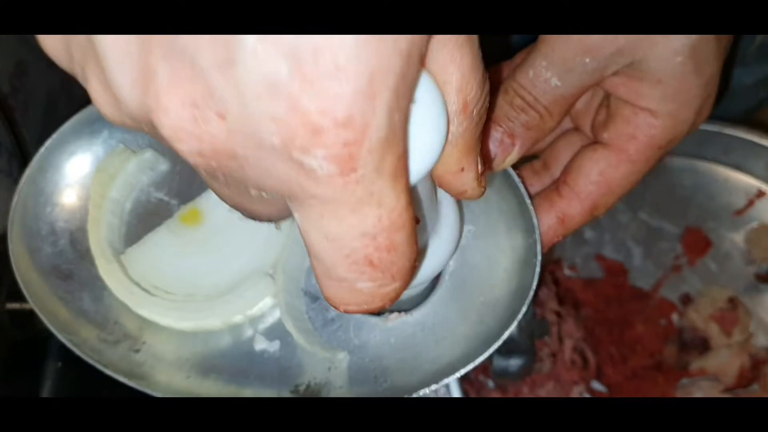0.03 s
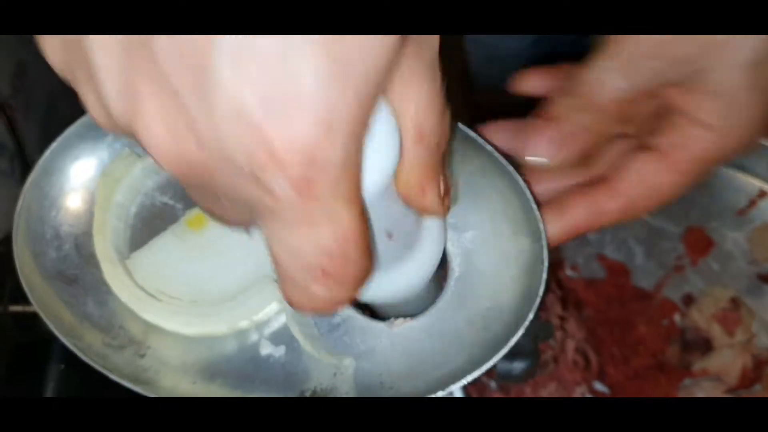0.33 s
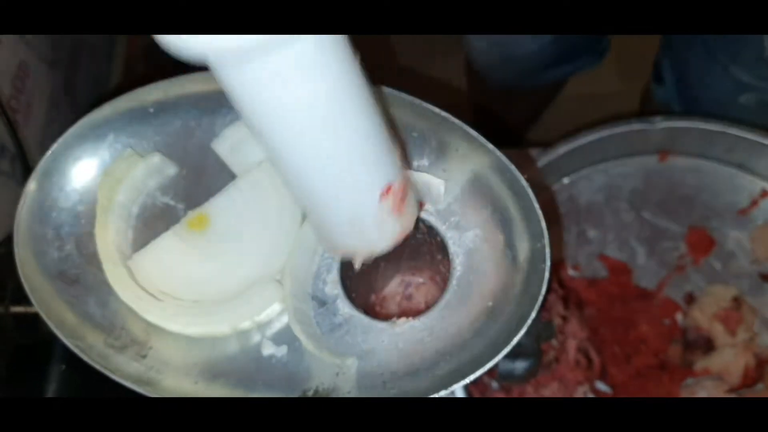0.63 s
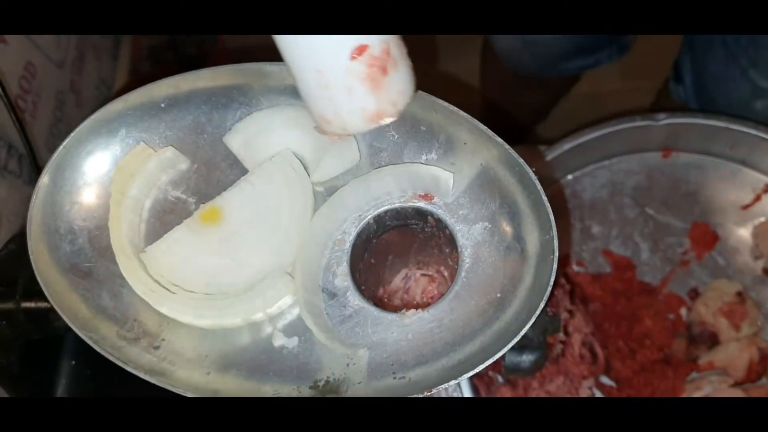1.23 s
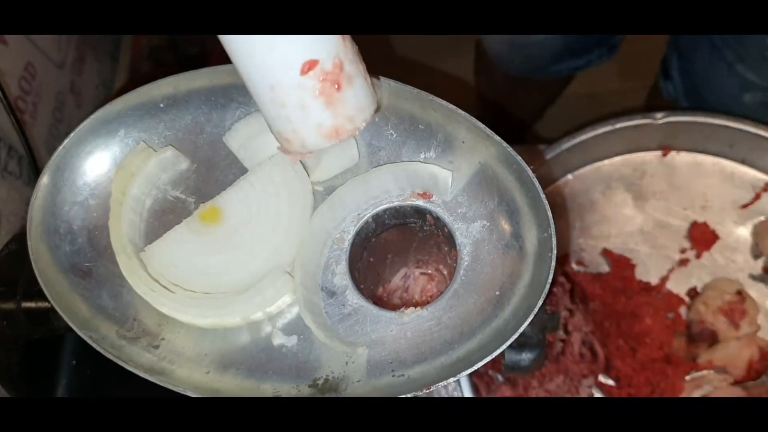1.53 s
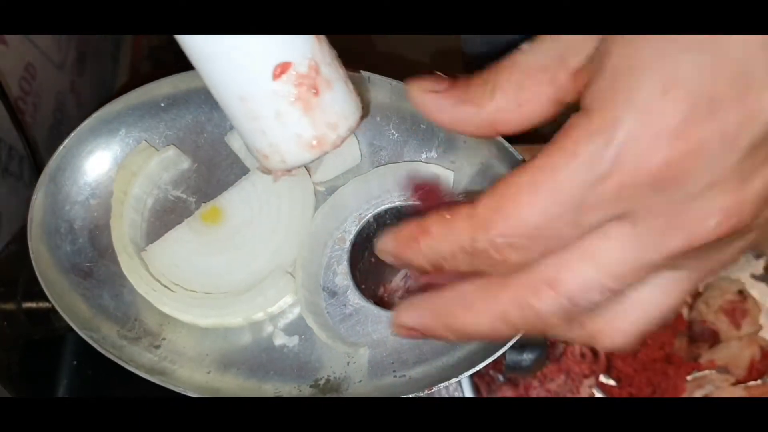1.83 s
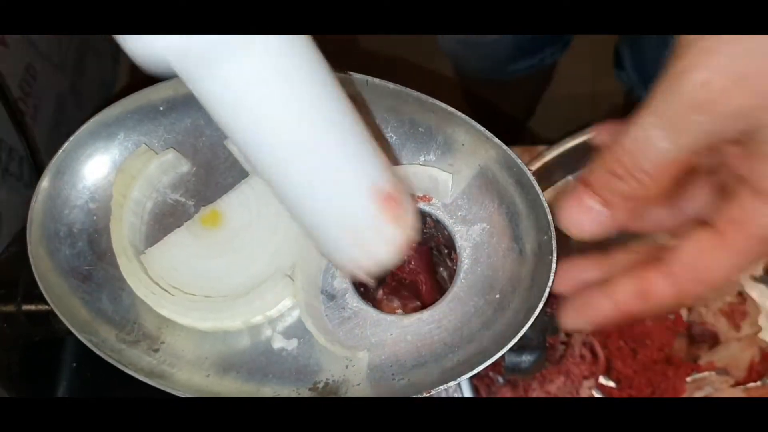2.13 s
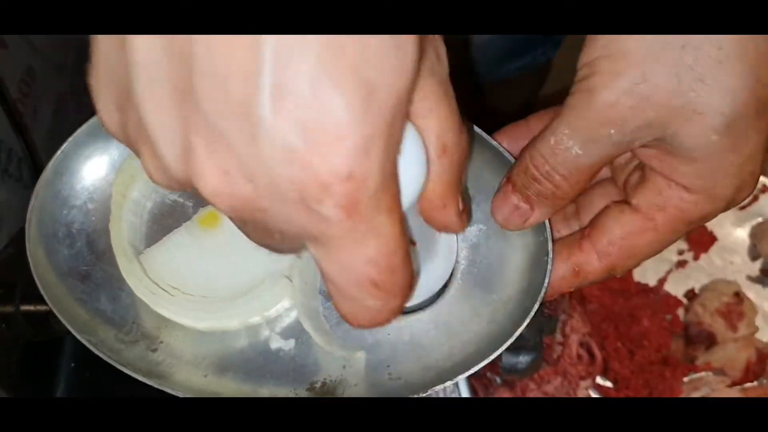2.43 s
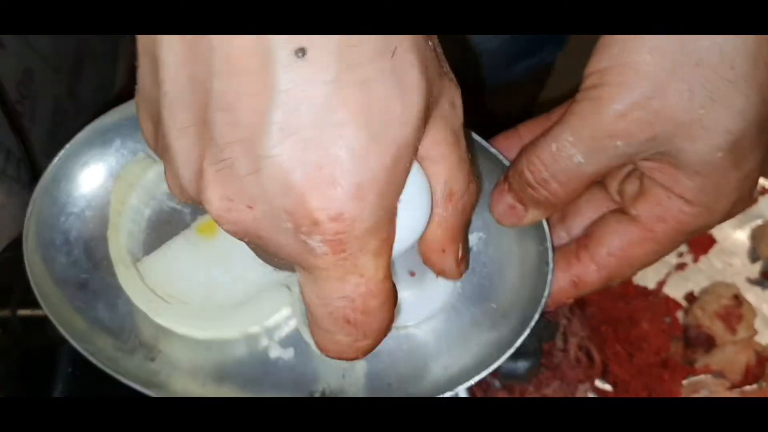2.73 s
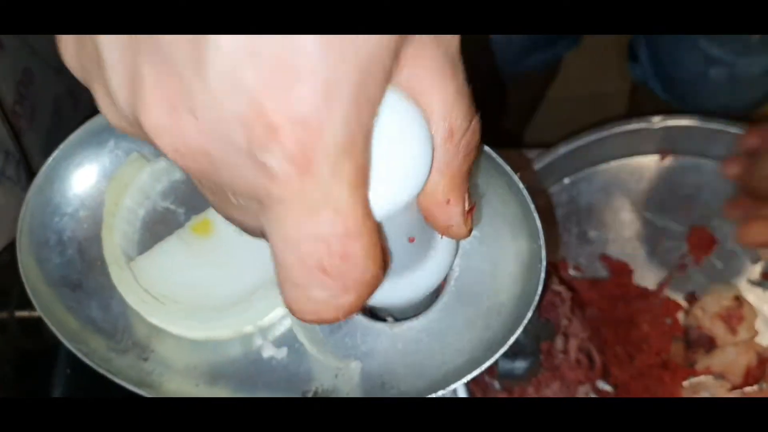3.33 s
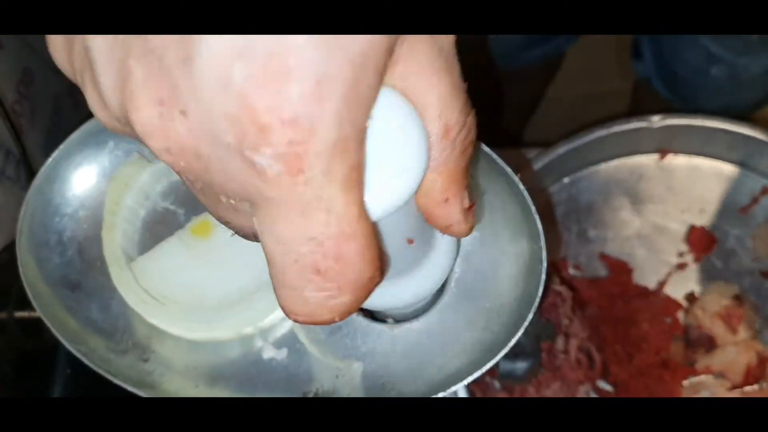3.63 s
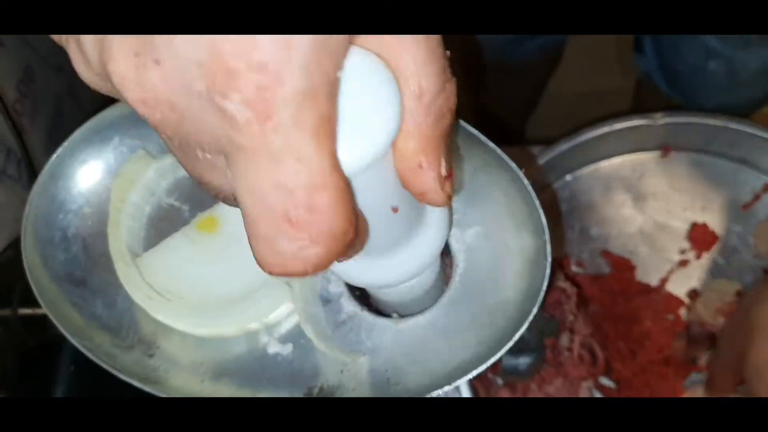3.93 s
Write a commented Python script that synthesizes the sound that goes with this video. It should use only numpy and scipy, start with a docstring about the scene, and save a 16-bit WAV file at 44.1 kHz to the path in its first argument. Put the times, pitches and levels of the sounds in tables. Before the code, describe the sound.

An electric meat grinder runs close by throughout, with a fluttering whine, a lower throbbing drone, gear clatter and hiss. Its pitch rises gradually until about 2.6 seconds. A plastic pusher knocks on the metal feed tube at 0.4 seconds, then five times quickly between 2.5 and 2.8 seconds, each with a brief ring. The motor slows a little, and a last knock comes at 3.9 seconds.

```python
"""An electric meat grinder runs close by in a kitchen. From the start, over gear clatter and brush hiss,
one gear stage whines, fluttering with each turn of the big wheel; the other drones lower, throbbing about
every second turn. The motor gains speed as the feed tube empties. A plastic pusher knocks on the metal
tube at 0.4 s, then five times from 2.5 to 2.8 s, around top speed. The motor slows a little, and a last
knock comes at 3.9 s."""
import sys
import numpy as np
from scipy import signal
from scipy.fft import rfft, irfft
from scipy.io import wavfile

SR = 44100
rng = np.random.default_rng(int(sys.argv[2]) if len(sys.argv) > 2 else 0)


def log_audio(samples):
    """Write samples as a 16-bit WAV file to the path given in sys.argv[1]."""
    # one column per channel
    frames = np.atleast_2d(samples).T
    # limit to full scale, then quantise
    limited = np.clip(frames, -1, 1)
    pcm = np.round(limited * 32767).astype(np.int16)
    wavfile.write(sys.argv[1], SR, pcm)


N = 176400
T = np.arange(N) / SR
BIN_HZ = np.fft.rfftfreq(N, 1 / SR)
PINION_TEETH, WHEEL_TEETH, SECOND_PINION_TEETH = 7, 54, 15
LEFT_LAG_RAD = 0.78


def gear_whine(speed_rps, shaft_turns, wheel_turns, gain_db=1, tight_rps=220, overtone_left_db=-38):
    """Fast mesh tone and its octave, rougher as tooth play grows with speed."""
    # Each row: time in seconds, relative level in dB, left minus right in dB.
    whine_levels = [(0, -29, -4), (.22, -29.5, -2), (.34, -18.5, 0), (.42, -27, 3), (.76, -16.5, -2.5),
                    (1.15, -21.5, 10), (1.52, -18.5, -6), (1.8, -21.5, 2.5), (2.05, -20.5, -5),
                    (2.3, -22.5, 2), (2.38, -27.5, 4), (2.48, -25, -8), (2.6, -33, -6), (2.78, -25, 1),
                    (3.4, -23.5, -3), (3.65, -29, 15), (3.72, -22, -16), (3.84, -31, 30), (4, -30.5, 9)]
    # Each row: time in seconds, right-channel level in dB.
    overtone_levels = [(0, -43), (.17, -22.5), (.3, -51), (.62, -38), (.74, -22), (.85, -30.5),
                       (1.25, -23.5), (1.6, -30), (1.85, -29.5), (2.03, -22.5), (2.3, -29), (2.42, -21),
                       (2.66, -24.5), (2.76, -29.5), (3.22, -25.5), (3.7, -22), (4, -36)]
    level_db, pan_db = curves(whine_levels)
    overtone_right_db, = curves(overtone_levels)
    play = np.maximum(.17, .029 * (speed_rps - tight_rps))
    cycles = PINION_TEETH * shaft_turns
    mesh = mesh_tone(cycles, wheel_turns, flutter=play, rough=play, rough_hz=36, slope=.35)
    whine = np.array([mesh * np.exp(-1j * LEFT_LAG_RAD) * amp(pan_db / 2), mesh * amp(-pan_db / 2)]).real
    octave = mesh_tone(2 * cycles, wheel_turns, flutter=play, rough=play, rough_hz=16, slope=.3).real
    overtone = np.array([octave * amp(overtone_left_db), octave * amp(overtone_right_db)])
    return whine * amp(level_db + gain_db) + overtone


def gear_drone(wheel_turns, gain_db=-2, throb_depth=.35):
    """Slow mesh tone, throbbing about every second wheel turn."""
    # Each row: time in seconds, relative level in dB.
    drone_levels = [(0, -37), (.25, -38), (.45, -23.5), (.75, -34), (1.1, -26.5), (1.35, -30),
                    (1.73, -23.5), (2.1, -27.5), (2.9, -33), (4, -27)]
    cycles = SECOND_PINION_TEETH * wheel_turns
    mesh = mesh_tone(cycles, wheel_turns, flutter=0, rough=.8, rough_hz=24)
    mesh *= unit(1 + throb_depth * np.cos(np.pi * wheel_turns + drift(rate_hz=4)))
    drone = np.array([mesh * np.exp(-1j * LEFT_LAG_RAD), mesh]).real
    return drone * amp(curves(drone_levels) + gain_db)


def partials(speed_rps, shaft_turns, wheel_turns, width_rps=17):
    """Shaft hum, overtones and mesh sum and difference tones, each swelling at its resonance."""
    # Each row: cycles per shaft turn, added cycles per wheel turn, left and right level
    # at resonance in dB, resonant shaft speed in turns per second.
    tones = [ (1, 0, -39, -38.5, 237), (0, 30, -37.5, -37.5, 205.7), (0, 30, -30, -35, 264.3),
             (7, -15, -34.5, -35.5, 236), (7, 15, -54, -26, 240), (14, 3, -58, -22, 272),
             (21, 0, -46, -24, 203), (8, 0, -37, -33, 242), ]
    out = np.zeros((2, N))
    for per_shaft, per_wheel, left_db, right_db, resonant_rps in tones:
        cycles = per_shaft * shaft_turns + per_wheel * wheel_turns
        tone = mesh_tone(cycles, wheel_turns, flutter=.33, rough=1, rough_hz=10.6).real
        detuning = (speed_rps - resonant_rps) / width_rps
        out += amp([[left_db], [right_db]]) * tone / (1 + detuning ** 2)
    return out


def mesh_tone(cycles, wheel_turns, flutter, rough, rough_hz, slope=1.0):
    """Complex tone roughened by tooth play, with optional flutter at each wheel turn."""
    shake = 1 + flutter * wheel_error(wheel_turns, slope)
    shake += rough * unit(drift(rough_hz) + 1j * drift(rough_hz))
    return unit(shake) * np.exp(2j * np.pi * cycles) * np.sqrt(2)


def wheel_error(wheel_turns, slope, harmonics=8):
    """Uneven teeth: a strength and timing pattern that repeats every wheel turn."""
    orders = np.r_[-harmonics:0, 1:harmonics + 1][:, None]
    one_turn = np.linspace(0, 1, 256)
    waves = np.exp(2j * np.pi * (orders * one_turn + rng.random(orders.shape)))
    pattern = (abs(orders) ** -slope * waves).sum(0)
    return unit(np.interp(wheel_turns % 1, one_turn, pattern))


def pusher_knocks(crack_db=3, crack_s=.013, crack_band_hz=(900, 4200)):
    """Each knock: a short crack and the ring of tube and tray, whose upper modes chatter most."""
    # Each row: start in seconds, level in dB, pitch ratio set by the spot struck.
    knocks = [(.368, -12, .9), (2.515, -10.5, .95), (2.532, -9, 1.02), (2.707, -19, 1.02),
              (2.797, -16, .95), (2.83, -13, 1.04), (3.868, -11.5, .88)]
    # Each row: frequency in Hz at pitch ratio 1, relative level in dB, T60 in seconds.
    tube_modes = [(1099, -6, .15), (2550, -6, .04), (3150, -10, .04), (4300, -7, .035), (7600, -14, .054)]
    out, t = np.zeros((2, N)), T[:SR // 2]
    band = signal.butter(2, crack_band_hz, "band", fs=SR, output="sos")
    for start_s, level_db, pitch in knocks:
        ring = np.zeros((2, len(t)))
        for hz, mode_db, t60_s in tube_modes:
            envelope = amp(mode_db - 60 * t / t60_s) * (1 - np.exp(-hz * t))
            cycles = hz * pitch * t + .34 * rng.random((2, 1))
            chatter_rad = min(hz / 1700, 2) * drift(rate_hz=hz / 10)[:len(t)]
            ring += envelope * np.sin(2 * np.pi * cycles + chatter_rad)
        burst = amp(crack_db) * np.exp(-t / crack_s) * rng.standard_normal((2, len(t)))
        add(out, start_s, amp(level_db) * (ring + signal.sosfilt(band, burst)))
    return out


def clatter_and_hiss(shaft_turns, wheel_turns, clatter_gain_db=-3.5, hiss_gain_db=-4,
                     crossover_hz=3760, commutator_bars=24):
    """Teeth slap at the slow mesh rate; brushes scrape and spark. Both waver at random."""
    # Each row: time in seconds, relative clatter level in dB, relative hiss level in dB.
    clatter_hiss_levels = [(0, -3, -5), (.35, 0, -3), (.41, -1, -0.5), (.56, 0.5, -1.5), (1.8, 1.5, 2),
                           (2.5, 4.5, 3), (2.58, 1, 0), (2.8, 1, 1.5), (2.95, -1, -1), (3.27, 2, 2),
                           (4, 2.5, 1.5)]
    clatter_db, hiss_db = curves(clatter_hiss_levels)
    waver = drift(rate_hz=21.5)
    teeth = np.cos(2 * np.pi * SECOND_PINION_TEETH * wheel_turns)
    uneven = wheel_error(wheel_turns, slope=.5).real
    slap_db = 2.4 * teeth + .7 * waver + .6 * uneven + 1.4 * drift(rate_hz=200)
    rotor = np.cos(2 * np.pi * shaft_turns)
    bars = np.cos(2 * np.pi * commutator_bars * shaft_turns)
    scrape_db = 1.1 * teeth + .7 * waver + .3 * rotor + .9 * bars + drift(rate_hz=500)
    treble_share = 1 / (1 + (crossover_hz / (BIN_HZ + 1)) ** 8)
    clatter = housing(unit(amp(slap_db)) * tooth_grit(wheel_turns), np.sqrt(1 - treble_share))
    hiss = housing(unit(amp(scrape_db)) * rng.standard_normal((2, N)), np.sqrt(treble_share))
    return clatter * amp(clatter_db + clatter_gain_db) + hiss * amp(hiss_db + hiss_gain_db)


def tooth_grit(wheel_turns, points=1400, repeat_share=.24):
    """Rough tooth faces: noise that partly repeats every wheel turn."""
    faces = signal.resample(rng.standard_normal((2, points)), 10 * points, axis=1)
    repeating = faces[:, (wheel_turns % 1 * 10 * points).astype(int)]
    return np.sqrt(repeat_share) * repeating + np.sqrt(1 - repeat_share) * rng.standard_normal((2, N))


def housing(drive, band_gain):
    """The housing colours a band of stereo noise; the channels are most alike in the bass."""
    # Each row: frequency in Hz, left and right relative noise density in dB.
    colour = [(39.2, -99, -99), (190, -66, -64.5), (277, -57, -56.5), (301, -62, -60.5), (440, -56, -53.5),
              (516, -60, -60), (910, -56, -55.5), (1414, -53, -55.5), (1577, -79, -47.5),
              (2110, -45.5, -56), (2130, -62.5, -52.5), (2850, -54.5, -54), (3190, -59, -58.5),
              (4230, -60.5, -48), (4490, -92, -43), (4943, -76, -47.5), (5045, -57, -39),
              (5160, -59.5, -52), (5734, -67, -48), (7640, -65.5, -68.5), (9650, -72, -60),
              (11450, -66.5, -60), (14700, -73.5, -73)]
    # Each row: frequency in Hz, left-right correlation from 0 to 1.
    correlation = [(200, 0.68), (500, 0.55), (3500, 0)]
    left, independent = rfft(drive)
    alike, = spectra(correlation)
    right = alike * left + np.sqrt(1 - alike ** 2) * independent
    return irfft(np.array([left, right]) * amp(spectra(colour)) * band_gain, N) * np.sqrt(SR / 2)


def amp(db):
    """Decibels to gain."""
    return 10 ** (np.asarray(db) / 20)


def unit(x):
    """Scales to rms 1."""
    return x / np.sqrt(np.mean(abs(x) ** 2) + 1e-20)


def curves(table):
    """Each column of a time table, at every sample."""
    times_s, *columns = np.transpose(table)
    return np.array([np.interp(T, times_s, column) for column in columns])


def spectra(table):
    """Each column of a frequency table, at every bin."""
    hz, *columns = np.transpose(table)
    return np.array([np.interp(np.log(BIN_HZ + 1), np.log(hz), column) for column in columns])


def drift(rate_hz):
    """Smooth noise of rms 1, rolling off above rate_hz."""
    white = rfft(rng.standard_normal(N)) * (BIN_HZ > 0)
    return unit(irfft(white / (1 + (BIN_HZ / rate_hz) ** 4), N))


def add(mix, start_s, sound):
    """Mixes a sound in at start_s."""
    part = mix[..., round(start_s * SR):][..., :sound.shape[-1]]
    part += sound[..., :part.shape[-1]]


def scene():
    """The motor turns the gear train; the pusher knocks over it."""
    # Each row: time in seconds, motor shaft speed in turns per second.
    motor_speed = [(0, 205.6), (.45, 222.5), (.73, 226), (1.03, 230), (1.5, 232.6), (1.73, 238),
                   (1.92, 237.1), (2.26, 241.3), (2.58, 243.5), (2.8, 240.5), (3.15, 239), (3.62, 240.3),
                   (3.74, 238.4), (3.88, 234.8), (4, 233)]
    speed_rps, = curves(motor_speed)
    shaft_turns = np.cumsum(speed_rps) / SR
    wheel_turns = shaft_turns * PINION_TEETH / WHEEL_TEETH
    return (gear_whine(speed_rps, shaft_turns, wheel_turns)
            + gear_drone(wheel_turns)
            + partials(speed_rps, shaft_turns, wheel_turns)
            + clatter_and_hiss(shaft_turns, wheel_turns)
            + pusher_knocks())


def record(dry, ceiling=.85, cutoff_hz=14450):
    """Soft clip, then low-pass."""
    rounded = dry / (1 + (dry / ceiling) ** 8) ** (1 / 8)
    lowpass = signal.firwin(511, cutoff_hz, window=("kaiser", 9), fs=SR)
    return signal.oaconvolve(rounded, lowpass[None], "same", axes=1)


dry = scene()
out = record(dry)
log_audio(out)
```